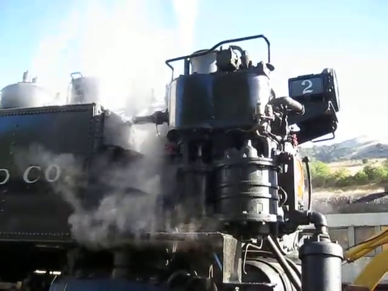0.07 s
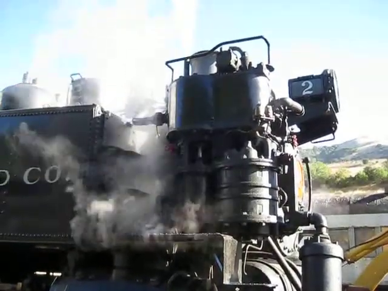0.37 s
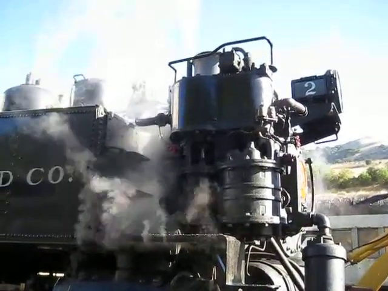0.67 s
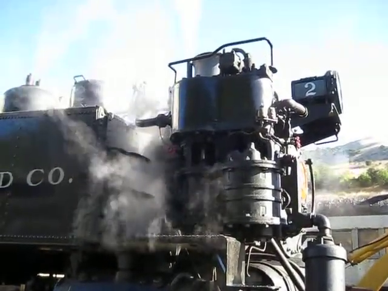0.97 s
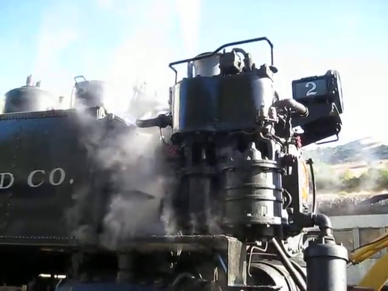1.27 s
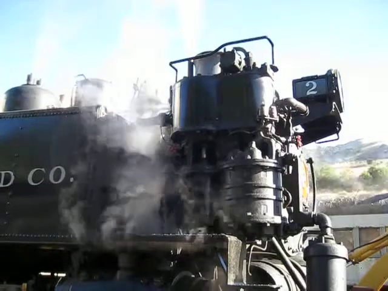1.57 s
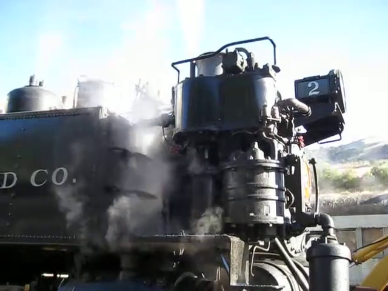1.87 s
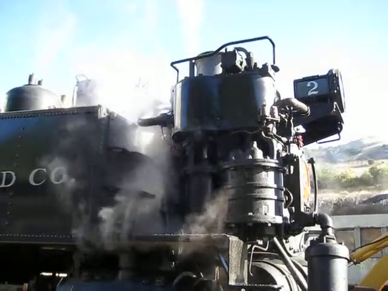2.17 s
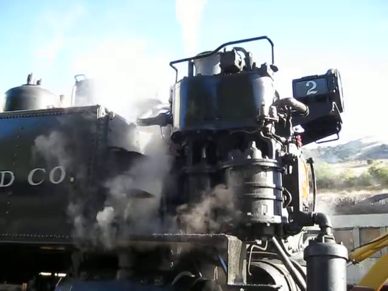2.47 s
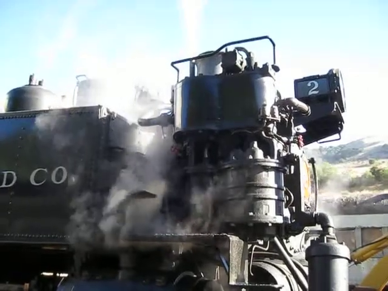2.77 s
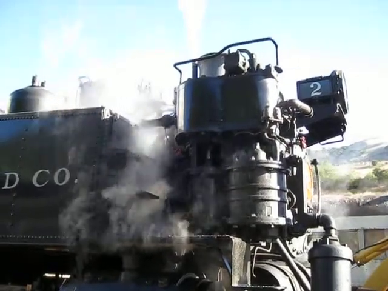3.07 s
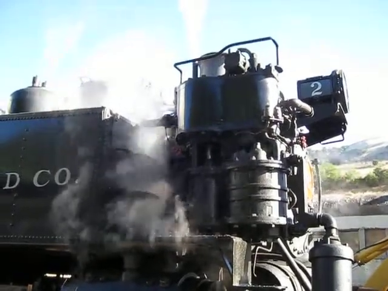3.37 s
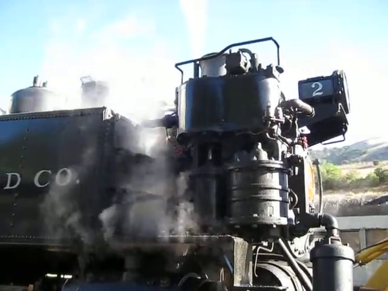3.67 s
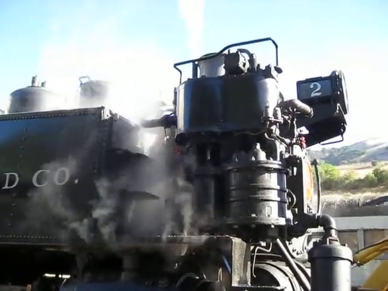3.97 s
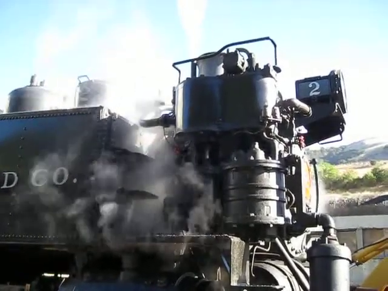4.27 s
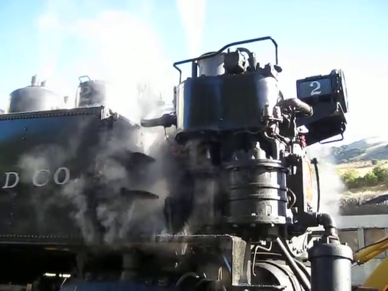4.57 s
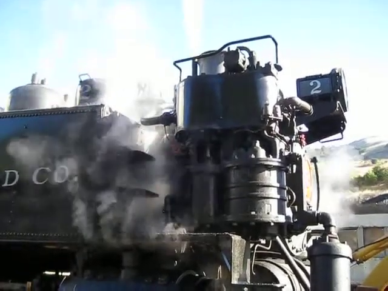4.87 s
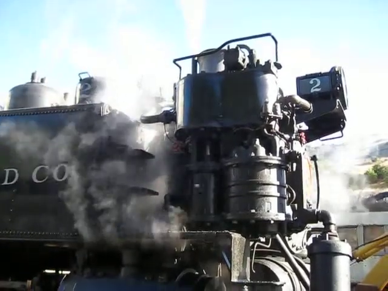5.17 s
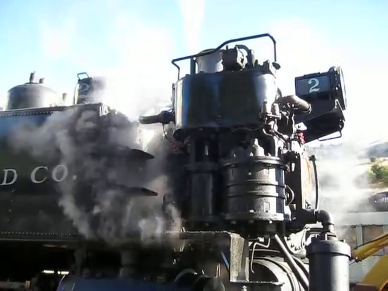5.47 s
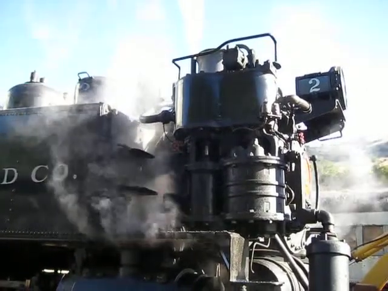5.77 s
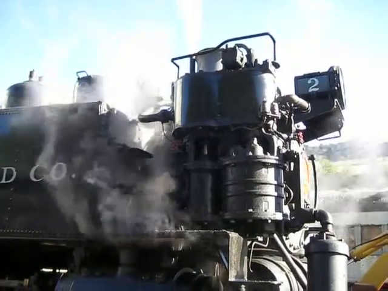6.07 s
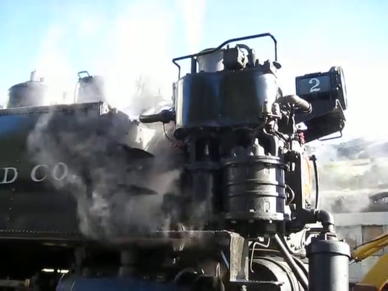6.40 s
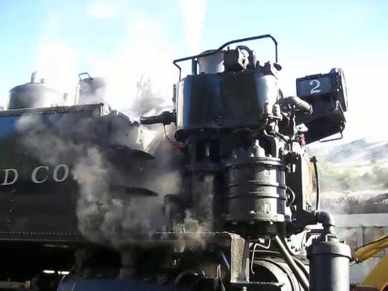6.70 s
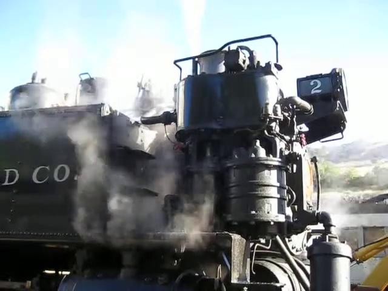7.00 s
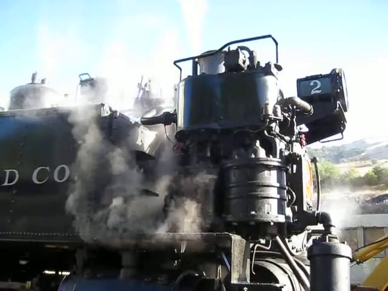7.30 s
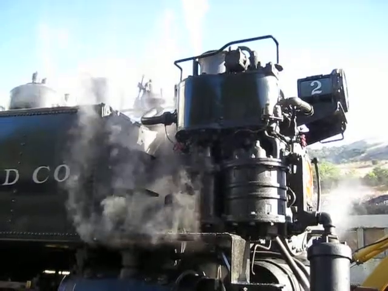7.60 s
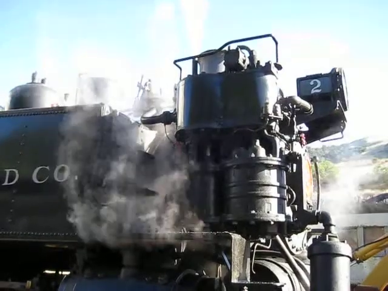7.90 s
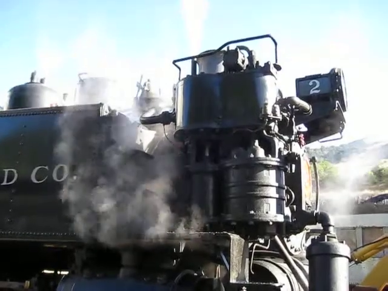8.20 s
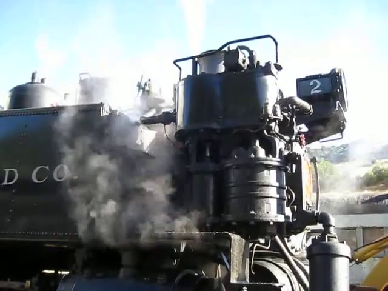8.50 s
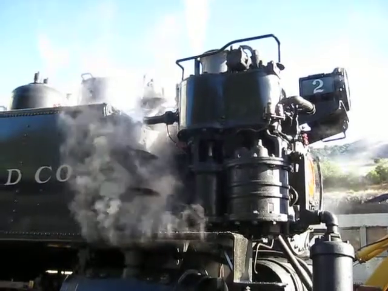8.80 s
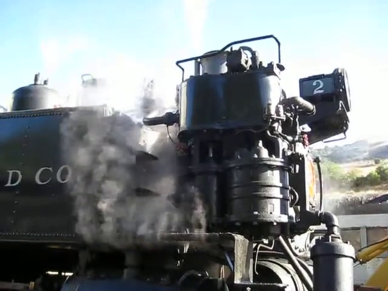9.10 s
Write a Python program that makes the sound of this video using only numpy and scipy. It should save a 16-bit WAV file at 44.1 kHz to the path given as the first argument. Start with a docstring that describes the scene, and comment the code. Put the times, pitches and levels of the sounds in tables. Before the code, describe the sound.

Continuous rushing steam from an idle locomotive, with regular sharp pump knocks, soft chuffs and a thin pulsing whistle.

```python
"""A steady roar and hiss of steam: turbulent jets blow off from a standing locomotive outdoors.
Its air compressor makes about two strokes a second. The piston's impact at each end of travel gives
a sharp knock, a thump and valve clatter, and a chuff of exhaust follows. A high hiss dips after each
knock, during the chuff, then recovers. A leak's thin whistle and a deep drone swell in each stroke.
A small mono camera stands close by, and its limiter ducks at the knocks."""
import sys
import numpy as np
from scipy import signal
from scipy.fft import rfft, irfft, next_fast_len
from scipy.io import wavfile
from scipy.ndimage import uniform_filter1d, map_coordinates

SR = 44100
rng = np.random.default_rng(int(sys.argv[2]) if len(sys.argv) > 2 else 0)


def log_audio(samples):
    """Write samples as a 16-bit WAV file to the path given in sys.argv[1]."""
    # one column per channel
    frames = np.atleast_2d(samples).T
    # limit to full scale, then quantise
    limited = np.clip(frames, -1, 1)
    pcm = np.round(limited * 32767).astype(np.int16)
    wavfile.write(sys.argv[1], SR, pcm)


N = 407925


def amp(db):
    """Amplitude ratio of a level in decibels."""
    return 10 ** (np.asarray(db) / 20)

def unit(x):
    """Normalisation to rms 1."""
    return x / np.sqrt(np.mean(x ** 2) + 1e-20)

def wobble(rate):
    """Smooth random modulation through rate knots a second."""
    return map_coordinates(rng.standard_normal(int(N * rate / SR) + 4), [np.arange(N) * rate / SR])

def filtered(x, response):
    """Linear filtering: the spectrum of x times a frequency response."""
    m = next_fast_len(N + SR // 2)
    return irfft(rfft(x, m) * response(np.fft.rfftfreq(m, 1 / SR)), m)[:N]

def noise(spectrum, resonances=()):
    """Source and filter: noise of rms 1 with a broad spectrum and bell-shaped resonances on top."""
    corner_hz, db = np.transpose(spectrum)
    grid = np.arange(0, SR / 2, 2)
    colour_db = np.interp(np.log(grid + 1), np.log(corner_hz), db)
    for centre, width, peak_db in resonances:
        colour_db += peak_db * np.exp(-(2 * (grid - centre) / width) ** 2)
    return unit(filtered(rng.standard_normal(N), lambda hz: np.interp(hz, grid, amp(colour_db))))

def band(centre_hz, width_hz):
    """Random excitation of one resonance, at rms 1."""
    return unit(filtered(rng.standard_normal(N), lambda hz: 1 / (1 + ((hz - centre_hz) / width_hz) ** 2)))

def bursts(events, rise, hold, t60):
    """Damped transients: an envelope rises, holds and decays exponentially at each (seconds, dB)."""
    envelope, t = np.zeros(N + 3 * SR), np.arange(SR) / SR
    shape = np.minimum(t / rise, 1) * amp(-60 * np.maximum(t - rise - hold, 0) / t60)
    for s, db in events:
        envelope[SR + round(s * SR):][:len(t)] += amp(db) * shape
    return envelope[SR:SR + N]

def drifting(x, depth_db):
    """Spectral fluctuation: narrow bands of a jet swell and fade by chance over tenths of a second."""
    bands = signal.stft(x, nperseg=1024)[2]
    drift = uniform_filter1d(rng.standard_normal(bands.shape), size=40, axis=1)
    return unit(signal.istft(bands * amp(depth_db * unit(drift)), nperseg=1024)[1][:N])

def each_stroke(*corners):
    """Cyclic modulation: straight lines through corners, each given as (times, values)."""
    points = sorted((s, v) for times, values in corners for s, v in np.broadcast(times, values))
    return np.interp(np.arange(N) / SR, *np.transpose(points))

# Piston strokes, from bottom and top in turn. Each row: start in seconds, knock level in dB, delay of
# the chuff's peak in seconds, then chuff, whistle and drone levels in dB. All table levels are relative.
STROKES = [(-0.2, -12, 0.21, -22.5, -38, -40), (0.3064, -12, 0.2, -24.0, -36, -39),
           (0.8745, -15, 0.19, -22, -37, -44.0), (1.3658, -12, 0.2, -24, -36.5, -37),
           (1.941, -13, 0.23, -23, -39.5, -44.5), (2.437, -11, 0.33, -24.0, -38, -35),
           (3.01, -15, 0.2, -22.0, -38.5, -38.0), (3.4941, -14.5, 0.2, -23.5, -35.5, -42),
           (4.0487, -14, 0.22, -22.5, -38.5, -38), (4.5384, -11.5, 0.15, -23.5, -33.5, -41),
           (5.1084, -11, 0.23, -23, -38.5, -43), (5.5902, -14.5, 0.2, -23.5, -38.0, -36),
           (6.1544, -13, 0.245, -23.5, -42, -43.5), (6.6463, -14, 0.27, -23.0, -44, -36.5),
           (7.211, -13.5, 0.25, -22.5, -40, -43.5), (7.706, -12, 0.24, -22, -42, -37),
           (8.2742, -14, 0.17, -23.0, -38.5, -48.0), (8.759, -13.5, 0.2, -22.5, -37, -42.0)]
def stroke_times(last_stroke_s=.55):
    """Reciprocating motion: each stroke starts at one reversal and ends at the next."""
    start = np.array(STROKES)[:, 0]
    return start, np.append(start[1:], start[-1] + last_stroke_s)

def drone(pitch_hz=35, lull_db=-47, swell_s=0.34, gain_db=1.5):
    """Amplitude modulation: a deep, wandering tone and rumble swell in each stroke and drop at its end."""
    start, end = stroke_times()
    peak_db = np.array(STROKES)[:, 5]
    level_db = each_stroke((start + .09, lull_db), (start + swell_s, peak_db), (end - .05, peak_db))
    tone = np.sin(2 * np.pi * np.cumsum(pitch_hz + 1.53 * wobble(7)) / SR)
    rumble = band(centre_hz=31, width_hz=9.6)
    return amp(level_db + gain_db + 1.7 * wobble(9.9)) * (1.02 * tone + 0.56 * rumble)

# Weaker modes of the whistling leak. Each row: frequency in Hz, level in dB.
WHISTLE_MODES = [(3540, -10), (3862, -8), (4282, -9), (5124, -8)]
def whistle(pitch_hz=4726, gain_db=5, lull_db=-45.5, cut_s=.045, swell_s=0.37, modes_db=-2):
    """Flow-excited resonance: a narrow leak's note swells in each stroke and is cut at the reversal."""
    start, end = stroke_times()
    peak_db = np.array(STROKES)[:, 4]
    level_db = each_stroke((start + cut_s, lull_db), (start + 0.154, lull_db),
                           (start + swell_s, peak_db), (end, peak_db - 1.5))
    unsteady_hz = pitch_hz + 1.2 * wobble(4) + 4 * wobble(70)
    note = amp(level_db + 1.3 * wobble(14)) * np.sin(2 * np.pi * np.cumsum(unsteady_hz) / SR)
    breath = sum(amp(db) * band(hz, width_hz=15) for hz, db in WHISTLE_MODES)
    breath_db = modes_db + (level_db + peak_db.mean()) / 2  # swells half as far as the note
    return amp(gain_db) * (note + amp(breath_db) * breath)

# Spectrum of the leaks. Each row: frequency in Hz, level in dB.
LEAK_SPECTRUM = [(1500, -27), (4000, 0.5), (6500, -3.5), (9000, 0.5), (11000, 3), (12100, 2), (13500, 2),
                 (15800, -2)]
# Resonances of the leaking joints. Each row: centre in Hz, width in Hz, boost in dB.
JOINT_RESONANCES = [(6620, 150, 2), (10560, 130, 2), (11330, 110, 3.5), (11600, 140, 3.3), (12520, 90, 2),
                    (12820, 100, 1.3), (13500, 250, 1.2)]
def leaks(flutter, dipped_db=-31, recovery_db=2.5, fall_s=0.077, low_until_s=0.22):
    """Turbulence at small leaks: a high hiss dips after each knock, during the chuff, then recovers."""
    start, end = stroke_times()
    recovered = each_stroke((start, 1), (start + fall_s, 0), (start + low_until_s, 0), (end - 0.12, 1))
    level_db = dipped_db + recovery_db * recovered + 0.43 * flutter + 0.73 * wobble(110)
    return amp(level_db) * drifting(noise(LEAK_SPECTRUM, JOINT_RESONANCES), depth_db=2.6)

# Resonances of the engine's body. Each row: centre in Hz, width in Hz, boost in dB.
BODY_RESONANCES = [(167, 16, 4.5), (235, 71, 8), (496.4, 54.7, 17), (539.4, 40.6, 15.5), (605, 104, 11),
                   (704, 65, 6.5), (738, 86, 7), (905, 63, 10), (975.6, 59, 13.5), (1048.7, 138, 20.5),
                   (1149, 32, 11.5), (1226, 133, 11.5), (1495, 24, 8.5), (1635, 160, 5), (1805, 140, 6.5),
                   (1955, 15, 8), (2100, 310, 6), (2346, 79, 7), (2575, 200, 7), (2824, 190, 5.5),
                   (3080, 117, 6), (3310, 49, 7), (3517, 134, 4.5), (3845, 120, 3.5), (4060, 58, 7.5),
                   (4256, 87, 4), (5230, 87, 4)]
def body_noise(spectrum):
    """Cavity resonance: the pipes and the spaces between boiler and pump colour a jet's noise."""
    return noise(spectrum, BODY_RESONANCES)

def exhaust_db(reversal_db=-27, lull_db=-26.5, late_puff_db=-24.5, fall_s=.19):
    """Pulsating flow: the exhaust level has one big chuff a stroke and a small puff before the end."""
    start, end = stroke_times()
    peak_delay, peak_db = np.array(STROKES)[:, 2:4].T
    return each_stroke((start + 0.013, reversal_db), (start + peak_delay, peak_db),
                       (start + peak_delay + fall_s, lull_db), (end - 0.057, late_puff_db))

# Spectrum of the blow-off. Each row: frequency in Hz, level in dB.
ROAR_SPECTRUM = [(40, -35), (65, -17), (130, -23), (210, -18), (440, -15.5), (500, -25), (850, -6.5),
                 (1000, -22), (1400, -6), (2200, -24), (5000, -59)]
# Slow easing of the blow-off. Each row: time in seconds, level in dB.
ROAR_LEVELS = [(0, -27.5), (4.6, -28), (6.5, -28), (7.3, -29), (9.25, -29)]
def blow_off(flutter, swell=0.35):
    """Jet noise: escaping steam roars steadily and swells a little with the exhaust."""
    steady_db = np.interp(np.arange(N) / SR, *np.transpose(ROAR_LEVELS))
    pulse_db = exhaust_db()
    level_db = steady_db + swell * (pulse_db - pulse_db.mean()) + 0.7 * flutter
    return amp(level_db) * body_noise(ROAR_SPECTRUM)

# Spectrum of the pump's spurts. Each row: frequency in Hz, level in dB.
SPURT_SPECTRUM = [(1500, -21.5), (2800, -6.5), (3500, -2), (4200, -0.5), (5000, -3), (5600, -6.5),
                  (6600, -6), (7500, -15), (12000, -33)]
def spurts(flutter):
    """A pulsed jet: steam spurts at once after a bottom reversal, later and softer after a top one."""
    start, _ = stroke_times()
    bottom, top = start[0::2], start[1::2]
    level_db = each_stroke((bottom - .03, -30.3), (bottom + 0.051, -25.7), (bottom + 0.36, -30.3),
                           (top, -28.8), (top + 0.1, -27), (top + 0.43, -29.6))
    level_db += 0.64 * flutter + 0.36 * wobble(60)
    return amp(level_db) * drifting(body_noise(SPURT_SPECTRUM), depth_db=2.0)

# Spectrum of the exhaust. Each row: frequency in Hz, level in dB.
CHUFF_SPECTRUM = [(400, -59), (1000, -20), (1450, -2), (2000, 0), (2700, -0.5), (3300, -3.5), (4200, -9),
                  (6000, -36)]
def chuffs(flutter):
    """Turbulent discharge: the exhaust of each stroke makes a swell of midrange noise."""
    return amp(exhaust_db() + 0.37 * flutter + 0.43 * wobble(80)) * body_noise(CHUFF_SPECTRUM)

# Reflections from nearby steel. Each row: delay in milliseconds, level in dB.
STEEL_ECHOES = [(5.55, -24), (7.52, -25), (8.52, -27), (10.09, -28), (10.65, -28), (14.39, -27),
                (14.65, -28), (17.75, -30), (19.4, -29), (20.51, -30)]
def steam():
    """Comb filtering: the four jets interfere with their own early reflections."""
    flutter = wobble(35)  # the jets flutter together
    jets = leaks(flutter) + blow_off(flutter) + spurts(flutter) + chuffs(flutter)
    echoes = lambda hz: sum(amp(db) * np.exp(-2j * np.pi * hz * ms * 1e-3) for ms, db in STEEL_ECHOES)
    return filtered(jets, lambda hz: 1 + echoes(hz))

# Valve seatings. Each row: offset from a top reversal in seconds, level in dB.
VALVE_SEATINGS = [(-.074, -17.5), (.177, -18)]
# Spectrum of a seating. Each row: frequency in Hz, level in dB.
TICK_SPECTRUM = [(1500, -16), (4500, 3), (6500, 3), (9500, -2), (13000, -3), (16000, -10)]
def valve_ticks(top):
    """Light impacts: air valves seat, a little irregularly, before and after each top reversal."""
    seatings = [(s + offset + rng.normal(0, 0.0059), db + rng.normal(0, 1.9))
                for s, _ in top for offset, db in VALVE_SEATINGS]
    return amp(-9.5) * bursts(seatings, rise=.001, hold=.002, t60=.075) * noise(TICK_SPECTRUM)

# Valve rattles. Each row: delay after a reversal in seconds, level in dB, band centre in Hz.
VALVE_RATTLES = [(.038, -27.5, 4100), (.040, -28.5, 8350), (.064, -30, 9900)]
def valve_clatter(reversals):
    """Damped resonance: the valves rattle in broad treble bands after every reversal."""
    clatter = np.zeros(N)
    for delay, db, hz in VALVE_RATTLES:
        hits = [(s + delay, db + rng.normal(0, 1.7)) for s, _ in reversals]
        clatter += bursts(hits, rise=0.0018, hold=0.0015, t60=0.1) * band(hz, width_hz=1800)
    return clatter

# Spectrum of a thump. Each row: frequency in Hz, level in dB.
THUMP_SPECTRUM = [(30, -15), (65, 11), (100, 0), (170, 4), (250, 5.5), (400, -4), (900, -14.5)]
def thumps(bottom, top):
    """Low-frequency impact response: each reversal thumps, louder and longer at the bottom."""
    envelope = bursts([(s, -43) for s, _ in top], rise=.004, hold=0.034, t60=0.12)
    envelope += bursts([(s - .012, -37.5) for s, _ in bottom], rise=.012, hold=0.044, t60=0.23)
    return envelope * noise(THUMP_SPECTRUM)

# Two knock spectra, top then bottom. Each row: frequency in Hz, level in dB.
KNOCK_SPECTRA = [
    [(100, -2), (400, -22), (1000, -14), (2500, 0), (5000, -2), (6000, -7), (9500, 2.5), (12500, 4),
     (15800, 6)],
    [(100, -19), (1000, -35), (2700, 2), (6000, 2), (9500, 0), (12500, 2), (15800, 1.5)],
]
# Resonances of the cylinder head. Each row: centre in Hz, width in Hz, boost in dB.
HEAD_RESONANCES = [(3500, 700, 6), (4900, 800, 7), (6300, 800, 4)]
def knocks(bottom, top):
    """Impact excitation: the piston rings the cylinder head, with a different spectrum at each end."""
    top_ring, bottom_ring = (noise(spectrum, HEAD_RESONANCES) for spectrum in KNOCK_SPECTRA)
    top_blows = amp(3) * bursts(top, rise=.0007, hold=.002, t60=.026)
    bottom_blows = amp(1.5) * bursts(bottom, rise=.001, hold=.0012, t60=.024)
    # at the bottom, steam spits just before the blow and again after it
    spits = bursts([(s - .012, -30) for s, _ in bottom], rise=.012, hold=.008, t60=.07)
    spits += bursts([(s + 0.023, -32.3) for s, _ in bottom], rise=.008, hold=0.022, t60=0.25)
    return top_blows * top_ring + (bottom_blows + spits) * bottom_ring

def compressor():
    """Reciprocating machinery noise: the piston's reversals time every impact."""
    reversals = np.array(STROKES)[:, :2]
    bottom, top = reversals[0::2], reversals[1::2]
    return valve_ticks(top) + valve_clatter(reversals) + thumps(bottom, top) + knocks(bottom, top)

def scene():
    """Superposition: all sources add at one microphone."""
    mono = drone() + whistle() + steam() + compressor()
    return np.array([mono, mono])

def limiter(x, threshold_db=-17, slope=0.7, release_db_per_s=220, attack_s=.0012):
    """Dynamic range compression: the gain drops quickly at a loud peak and recovers steadily."""
    level_db = 10 * np.log10(np.abs(uniform_filter1d(x ** 2, size=90)) + 1e-12)
    excess_db = np.maximum(level_db - threshold_db, 0)
    recovery_db = release_db_per_s * np.arange(N) / SR
    cut_db = np.maximum.accumulate(slope * excess_db + recovery_db) - recovery_db
    lag = np.exp(-1 / (attack_s * SR))
    return x * amp(-signal.lfilter([1 - lag], [1, -lag], cut_db))

NOTCH_HZ, NOTCH_WIDTH_HZ, BAND_LIMIT_HZ = 7890, 650, 15790
def record(dry):
    """Limiting and filtering: the camera ducks peaks, notches the treble and cuts off the highest band."""
    notch = lambda hz: np.abs(hz - NOTCH_HZ) / np.hypot(hz - NOTCH_HZ, NOTCH_WIDTH_HZ)
    mono = filtered(limiter(dry[0]), lambda hz: notch(hz) * (hz < BAND_LIMIT_HZ))
    return np.array([mono, mono])


dry = scene()
out = record(dry)
log_audio(out)
```